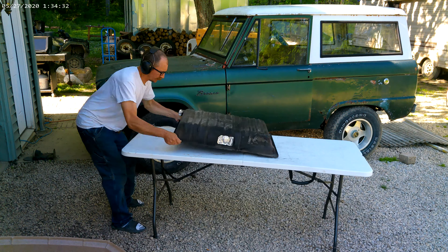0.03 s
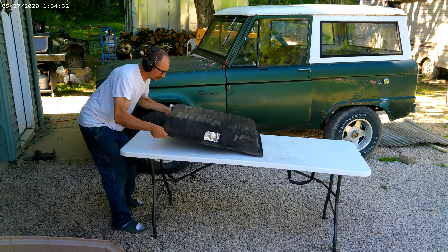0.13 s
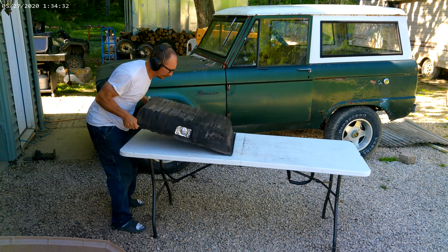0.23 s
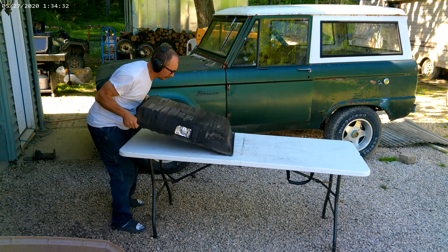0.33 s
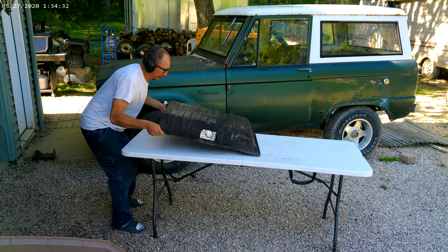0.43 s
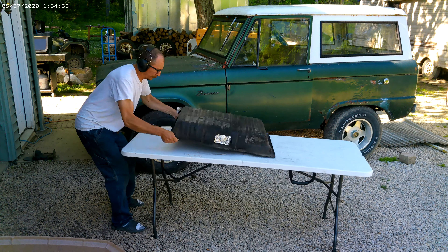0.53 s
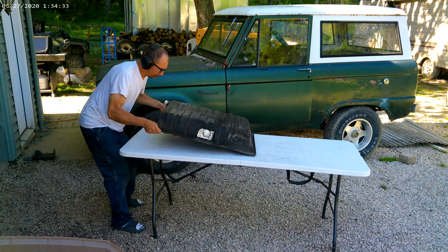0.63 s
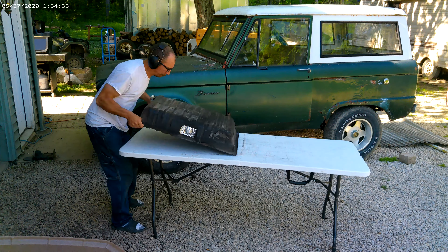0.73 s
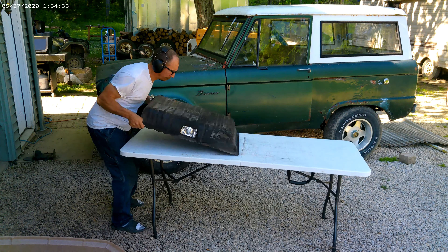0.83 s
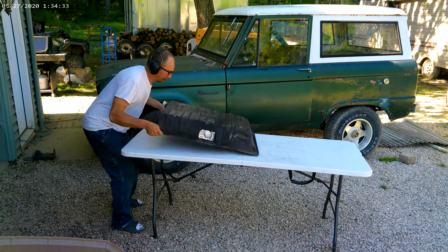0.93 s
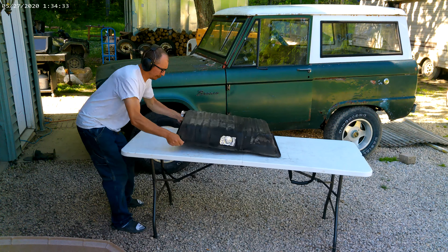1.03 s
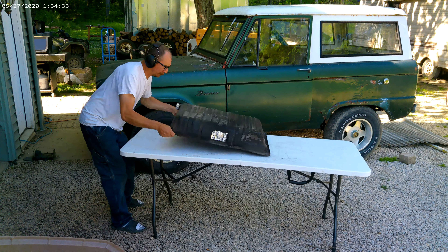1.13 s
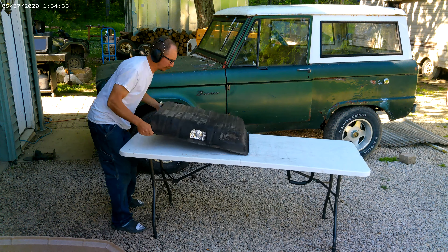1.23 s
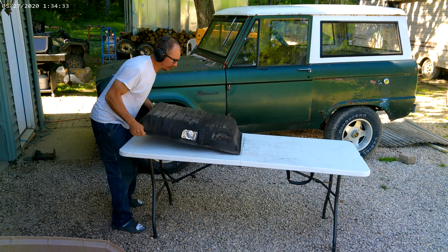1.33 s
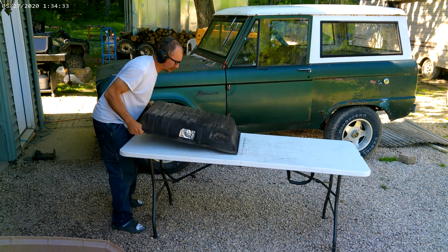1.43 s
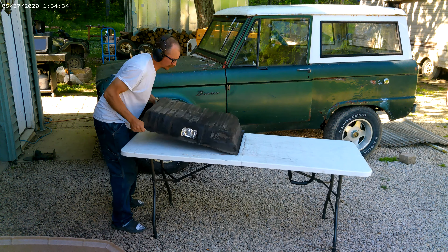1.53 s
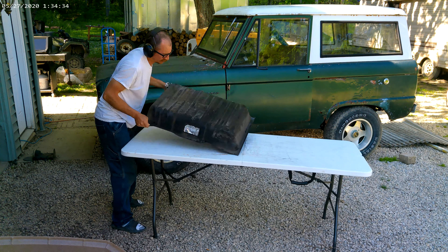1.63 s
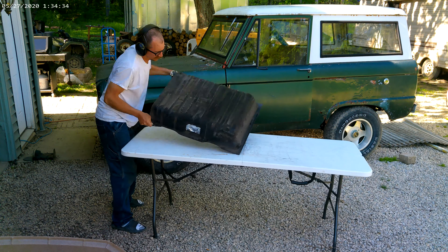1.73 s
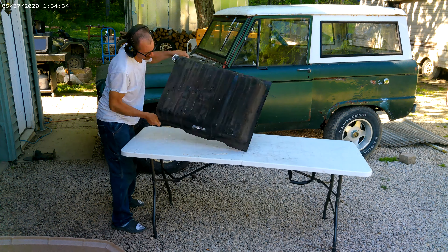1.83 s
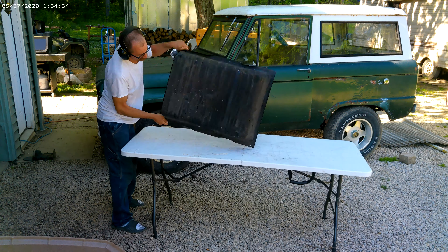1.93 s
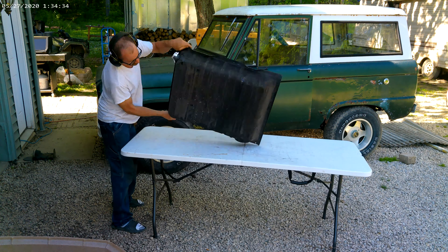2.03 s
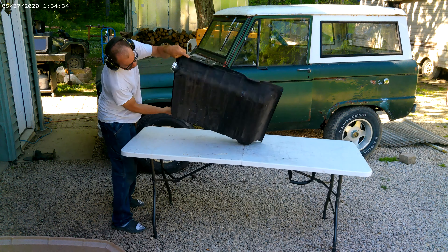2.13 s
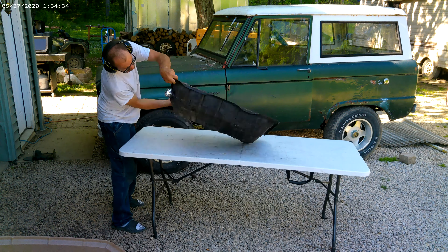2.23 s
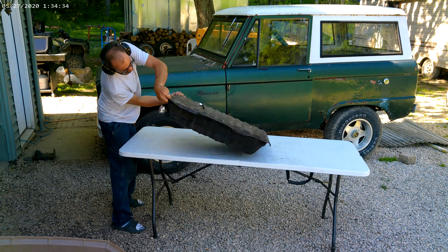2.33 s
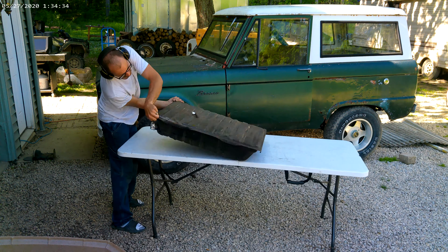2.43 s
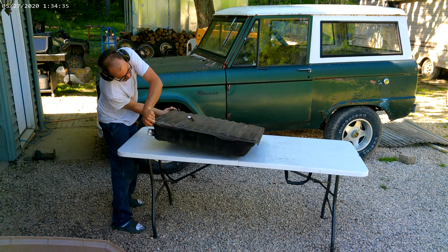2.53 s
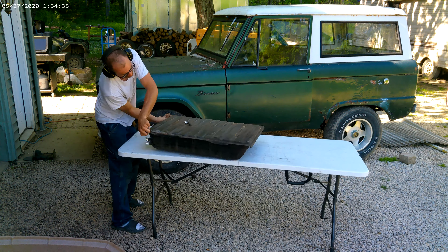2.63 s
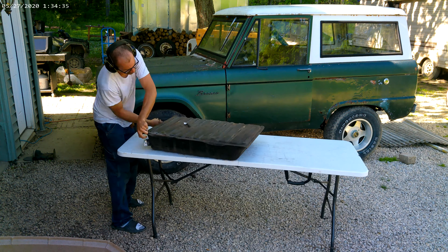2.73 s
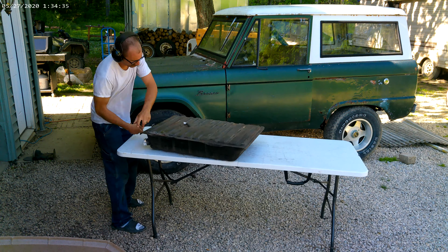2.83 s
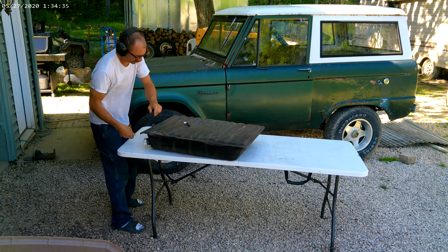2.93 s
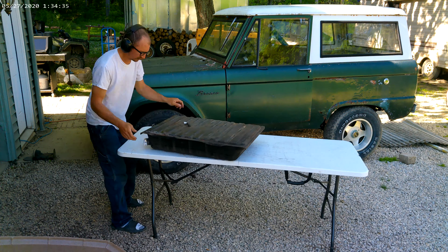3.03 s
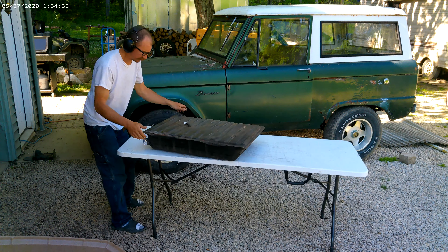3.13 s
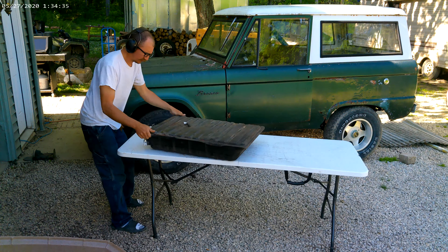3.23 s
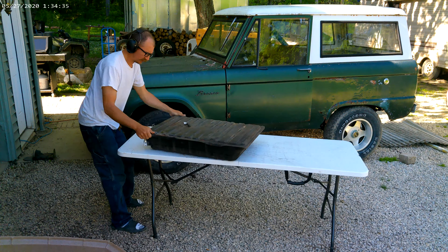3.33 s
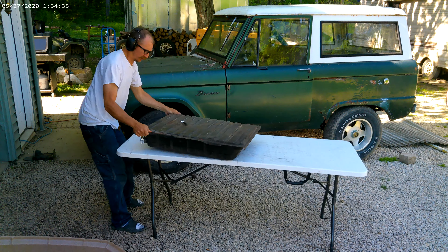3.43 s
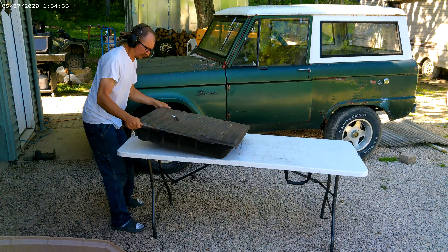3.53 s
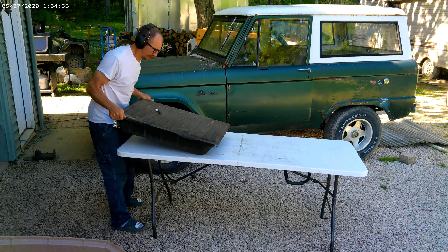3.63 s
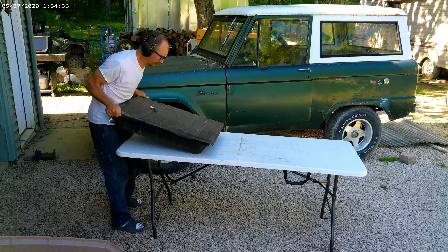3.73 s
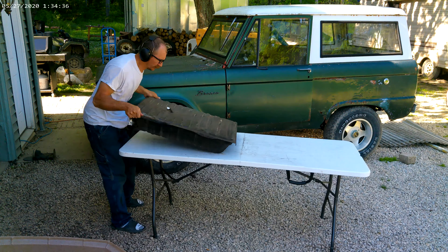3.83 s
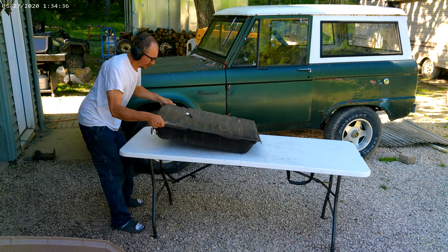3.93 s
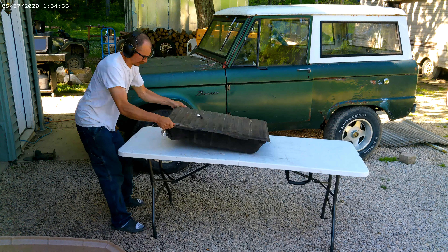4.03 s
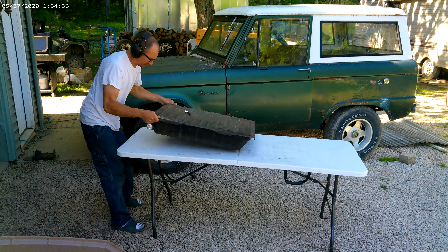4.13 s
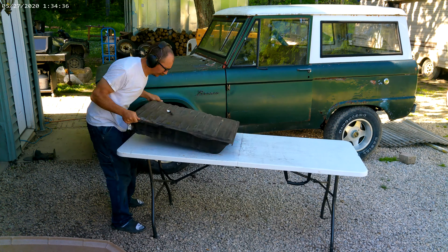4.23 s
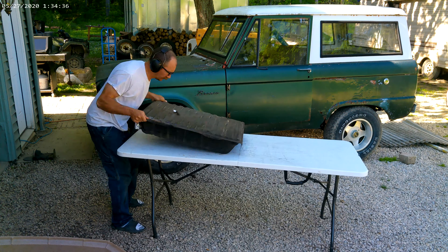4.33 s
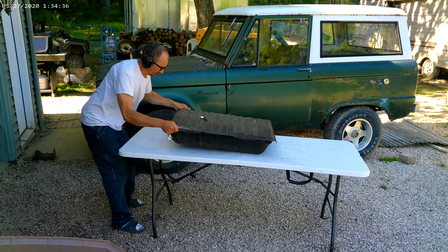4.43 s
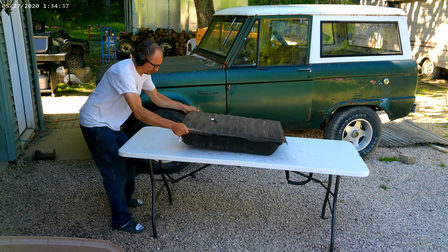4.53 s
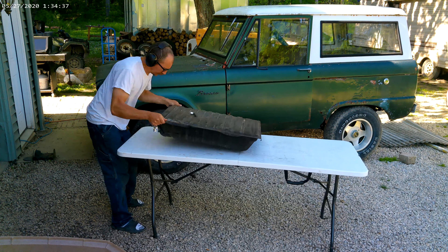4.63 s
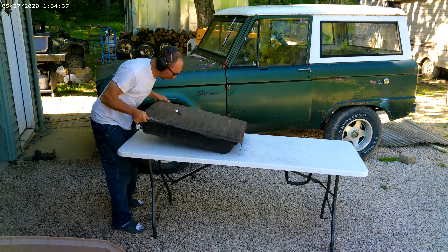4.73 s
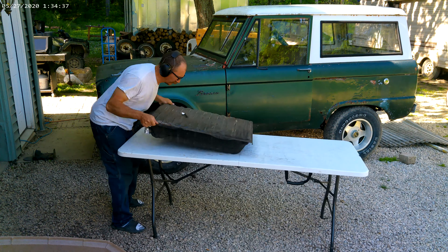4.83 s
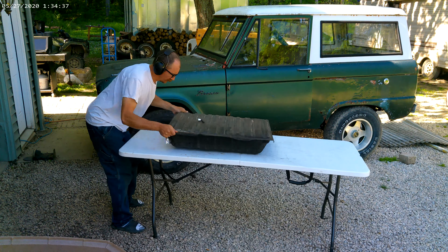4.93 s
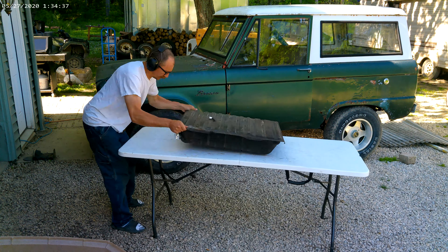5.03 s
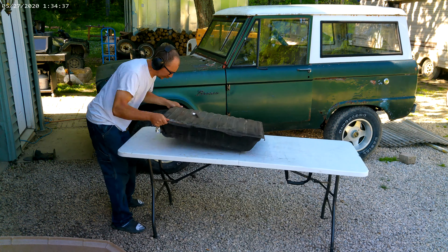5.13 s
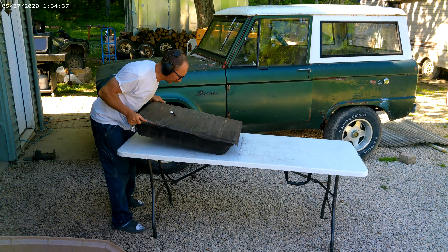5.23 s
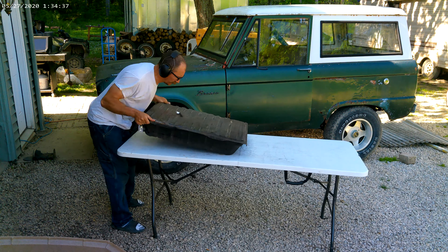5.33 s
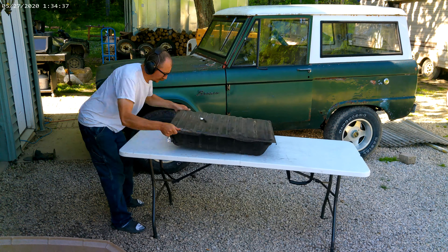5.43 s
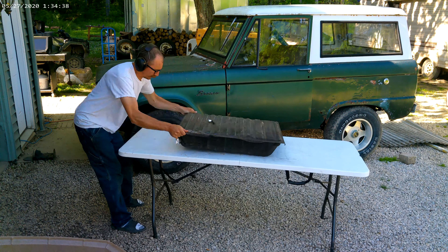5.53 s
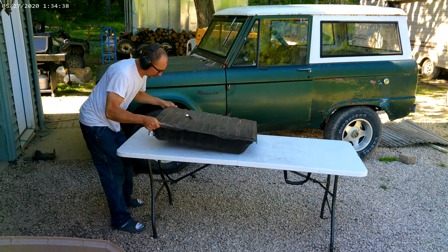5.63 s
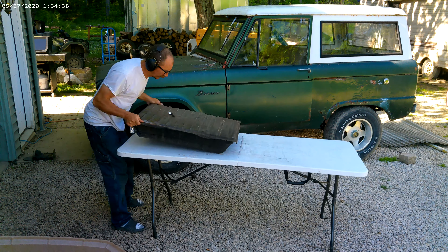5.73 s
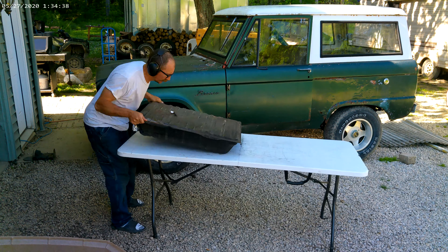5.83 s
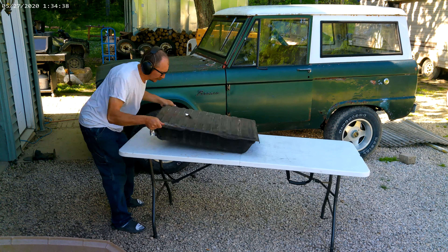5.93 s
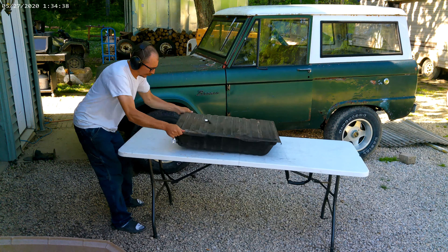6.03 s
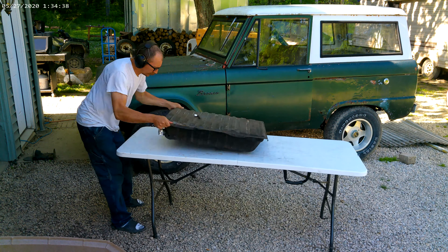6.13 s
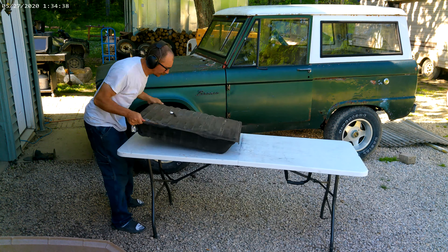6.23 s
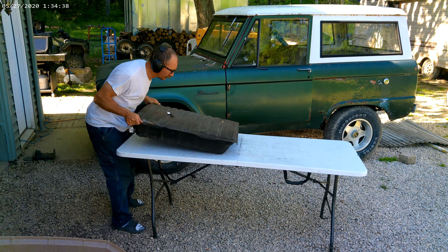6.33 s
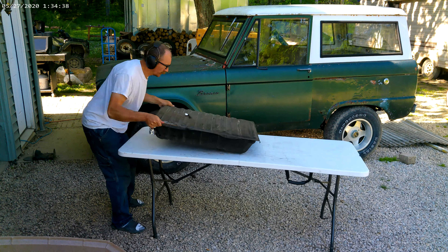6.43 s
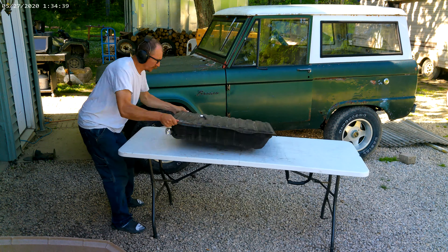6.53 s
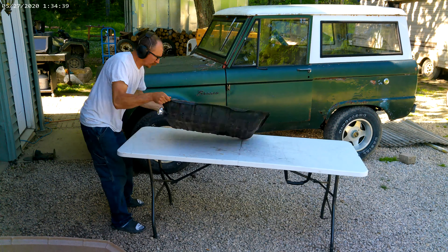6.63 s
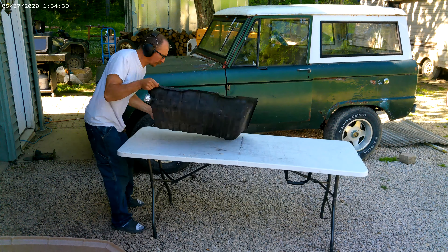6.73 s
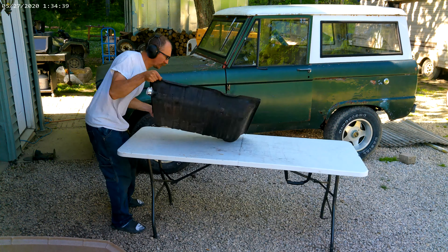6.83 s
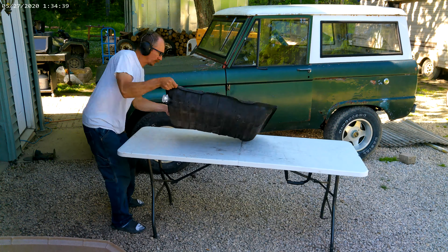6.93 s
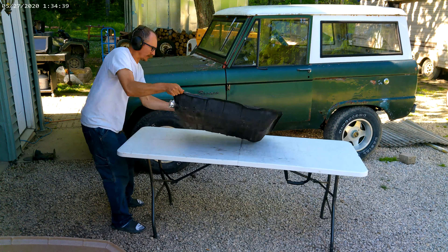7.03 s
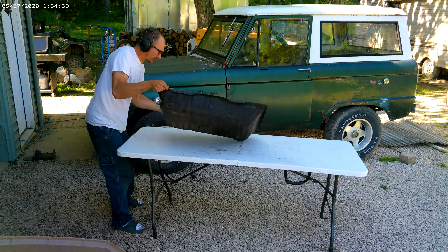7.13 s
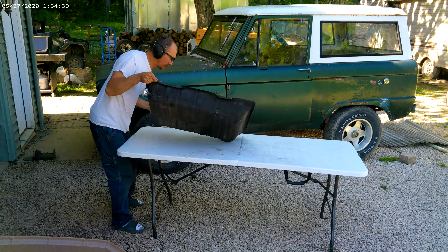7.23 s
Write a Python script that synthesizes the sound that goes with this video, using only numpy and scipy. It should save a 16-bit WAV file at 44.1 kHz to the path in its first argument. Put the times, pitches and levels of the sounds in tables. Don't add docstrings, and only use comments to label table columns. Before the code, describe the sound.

Loose gravel slams and rattles loudly inside a hollow steel tank rocked by hand, nearly hushes as it is turned over, then crashes harder again.

```python
import sys
import numpy as np
from scipy import signal
from scipy.fft import rfft, irfft, next_fast_len
from scipy.io import wavfile
from scipy.ndimage import uniform_filter1d

SR = 44100
rng = np.random.default_rng(int(sys.argv[2]) if len(sys.argv) > 2 else 0)


def invert_db(level):
    return 10 ** (np.asarray(level, dtype=float) / 20)


def unload_wav(signal):
    wavfile.write(
        sys.argv[1],
        SR,
        np.round(np.clip(np.atleast_2d(signal).T, -1, 1) * 32767).astype(np.int16),
    )


N = 321048
MODE_COUNT = 1400


def evened(x):
    return x / np.sqrt(np.mean(x ** 2) + 1e-20)


def read(points, hz):
    f, value = np.transpose(points)
    return np.interp(np.log(hz + 1), np.log(f + 1), value)


def resonate(x, hz, width):
    return signal.lfilter(*signal.iirpeak(hz, hz / width, SR), x)


def wander(smooth_s):
    size = max(round(smooth_s * SR), 1)
    once = uniform_filter1d(rng.standard_normal(N), size)
    return evened(uniform_filter1d(once, size))


def yard():
    # frequency in Hz, level in dB.
    air_tone = [(12, -31.5), (20, 6), (48, 7), (116, -6.5), (365, -22), (468, -31), (879, -28), (980, -39),
                (2700, -39), (14000, -40)]
    level_db = -51.5 + 1.1 * wander(0.087)
    colour = invert_db(read(air_tone, np.fft.rfftfreq(N, 1 / SR)))
    air = irfft(rfft(rng.standard_normal(N)) * colour, N)
    return invert_db(level_db) * evened(air)


def surge(t, peak_s, rise_s, fall_s):
    edge_db = -12.5
    return edge_db * np.maximum((peak_s - t) / max(rise_s, .005), (t - peak_s) / max(fall_s, .005))


def load():
    # time in seconds, rattle in dB,
    # stone-on-stone chatter in dB above it, wall boom in dB above it.
    rolling = [(0.0, -17.5, -5, -2), (0.5, -17.5, -1.5, -1.5), (1.0, -18, -6.5, -3), (1.455, -20, -13, -3),
               (1.465, -33, -22, -3), (1.68, -52.5, -19, 7), (1.83, -60, -5, 10), (1.96, -34, -6, 6),
               (2.2, -24, -15, 0), (2.74, -30, -22, -7.5), (2.9, -40.5, -16, -6), (3.12, -53, -20, 5),
               (3.47, -57, -16, 0), (3.54, -39, -15, -1.5), (3.815, -33.5, -12, 2.5), (3.83, -20, -18, -2),
               (4.6, -19.5, -9.5, -3), (7.28, -19.5, -10.5, -2.5)]
    # peak in seconds, rattle in dB, fall in seconds, chatter in dB.
    slams = [
        (0.01, -7, 0.01, -11.5),
        (0.148, -6.5, 0.032, -2),
        (0.64, -8, 0.1, -5),
        (1.12, -8.5, 0.089, -4.5),
        (2.31, -12.5, 0.067, -10),
        (4.087, -9.5, 0.081, -9.5),
        (4.601, -5, 0.12, -9.5),
        (5.072, -6, 0.14, -10),
        (5.601, -2.5, 0.065, -14),
        (6.114, -6, 0.12, -14),
    ]
    # peak in seconds, rattle in dB,
    # length in seconds, chatter in dB.
    slides = [(0.259, -11, .1, -20.5), (0.949, -16.5, 0.14, -5.5), (1.343, -21, 0.22, -1.5),
              (2.103, -20.5, 0.12, -12.5), (2.175, -20, 0.059, -7), (2.252, -15, 0.03, -21),
              (2.403, -16, 0.061, -5.5), (2.473, -17, 0.055, -8.5), (2.59, -16, 0.029, -29),
              (2.653, -15, 0.082, -10), (2.756, -26.5, 0.039, -6), (3.627, -32.5, 0.051, -18),
              (4.396, -12.5, 0.1, -11), (4.46, -10.5, 0.18, -13), (4.734, -16.5, 0.03, 1.5),
              (4.907, -8, 0.3, -14), (5.241, -15.5, 0.037, 1.5), (5.383, -10.5, 0.24, -14.5),
              (5.767, -12, 0.21, -14), (5.918, -11, 0.18, -14), (6.019, -12.5, 0.056, -11),
              (6.286, -15, 0.06, -35), (6.407, -14, 0.39, -15.5), (6.667, -14.5, 0.14, -6.5),
              (6.967, -14, 0.14, -7.5), (7.095, -12.5, 0.33, -8), (7.242, -15, 0.011, -9),
              (0.702, -10.5, 0.058, -21), (6.558, -23, 0.13, -67)]
    # time in seconds, dip in dB.
    pauses = [(0.33, -1.5), (0.52, -4), (1.27, -1.5), (2.2, -5.5), (2.435, -7.5), (2.555, -9), (4.77, 0),
              (5.45, -2), (5.84, -5), (5.985, -4.5), (6.33, -4.5), (6.86, -7), (7.03, -1.5), (7.221, -5)]
    slam_rise_s, slide_rise = 0.034, .5
    lull_s, lull_db, lull_width_s = .06, -4, .025
    surge_boom, boom_lead_s = -0.23, 0.011

    t = np.arange(0, N / SR + .02, .002)
    s, *columns = np.transpose(rolling)
    rolling_db, chatter_db, boom_db = (np.interp(t, s, db) for db in columns)
    rows = [(rolling_db, chatter_db)]
    for at, db, length, extra in slides:
        rows.append((db + surge(t, at, slide_rise * length, (1 - slide_rise) * length), extra))
    dip_db = sum(lull_db * np.exp(-((t - at + lull_s) / lull_width_s) ** 2) for at, *_ in slams)
    dip_db = dip_db + sum(db * np.exp(-((t - at) / 0.016) ** 2) for at, db in pauses)
    rows = [(db + dip_db, extra) for db, extra in rows]
    rows += [(db + surge(t, at, slam_rise_s, fall), extra) for at, db, fall, extra in slams]

    rattle_db = 10 * np.log10(sum(invert_db(db) ** 2 for db, _ in rows))
    chatter_db = 10 * np.log10(sum(invert_db(db + extra) ** 2 for db, extra in rows))
    boom_db = rattle_db + boom_db + surge_boom * (rattle_db - rolling_db)
    boom_db = np.interp(t + boom_lead_s, t, boom_db)
    heard = np.arange(N) / SR + 0.0065
    return [np.interp(heard, t, db) for db in (rattle_db, boom_db, chatter_db)]


def table(load_db):
    # resonance in Hz, width in Hz, level in dB.
    table_modes = [(57, 60, -2.5), (83.3, 21, 3.5), (171, 24, 2)]
    # time in seconds, level in dB.
    jolt_rows = [(0.03, -35), (0.32, -41), (0.5, -35), (0.66, -34), (1.0, -35), (1.23, -35), (1.34, -41),
                 (1.55, -50), (1.7, -57), (2.29, -44), (2.46, -32), (2.55, -39), (2.78, -38), (3.57, -48),
                 (3.97, -41), (4.12, -41), (4.59, -29.5), (5.05, -31), (5.13, -44), (5.6, -35), (5.88, -38),
                 (4.88, -37), (6.11, -33), (6.99, -41), (7.05, -37)]
    # start in seconds, peak in dB, pitch in Hz, t60 in seconds.
    bump_rows = [(0.169, 3.5, 513, 0.12), (0.585, 0, 810, 0.1), (1.329, -12, 586, 0.12),
                 (1.76, -39, 333, 0.24), (2.01, -4, 418, 0.095), (2.083, 11, 468, 0.038),
                 (2.31, -2, 600, 0.11), (2.385, -6, 604, 0.1), (2.6, -10, 793, 0.1), (2.98, -17, 702, 0.12),
                 (3.585, -22, 800, 0.08), (3.652, -17, 800, 0.13), (3.752, -13, 800, 0.06),
                 (3.77, -22, 450, 0.15), (4.815, 4, 597, 0.08), (2.466, -5, 289.4, 0.27),
                 (2.497, -20, 300, 0.2), (2.739, -12.5, 446, 0.22), (2.775, -13, 308, 0.11),
                 (3.497, -20, 428, 0.082), (4.574, 7, 453, 0.13), (4.4, -8, 773, 0.17),
                 (4.87, 7, 720, 0.068), (5.58, -5, 450, 0.087), (6.102, -1.5, 690, 0.32),
                 (7.185, -17, 440, 0.083)]
    jolt_rise_db_s, jolt_fall_db_s = 400, 205

    time, noise = np.arange(N) / SR, rng.standard_normal(N)
    shake = invert_db(-42.5 + 0.34 * (load_db + 9.5) + wander(.04))
    step = time[::100]
    jolts = sum(invert_db(db - np.maximum(jolt_rise_db_s * (s - step), jolt_fall_db_s * (step - s)))
                for s, db in jolt_rows)
    shake = shake + np.interp(time, step, jolts)
    shaken = sum(invert_db(db) * resonate(resonate(noise, hz, w), hz, 2 * w) for hz, w, db in table_modes)
    out = evened(shaken) * shake

    t = np.arange(9000) / SR
    for (s, peak_db, hz, t60), detune in zip(bump_rows, rng.standard_normal((len(bump_rows), 5))):
        cluster = np.sin(2 * np.pi * hz * np.outer(t, 1 + 0.12 * detune)).sum(1)
        cluster = cluster + 2.4 * np.sin(2 * np.pi * hz * t)
        bump = invert_db(peak_db - 13.5 - 60 * t / t60) * (1 - np.exp(-t / 0.017)) * cluster
        part = out[round(s * SR):][:len(t)]
        part += bump[:len(part)]
    return out


def grit(load_db):
    rasp_s = (3.38, 3.55, 4.05, 4.3)
    grains = rng.standard_normal(N) * invert_db(3 * wander(.002))
    hiss = evened(signal.sosfilt(signal.butter(2, 9000, "high", fs=SR, output="sos"), grains))
    moving = np.interp(np.arange(N) / SR, rasp_s, (0, 1, 1, 0))
    return hiss * moving * invert_db(-49 + 0.41 * (load_db + 20))


def ticks():
    # start in seconds, peak in dB, centre in Hz.
    tick_rows = [(0.538, -10, 3500), (0.885, -10, 8000), (2.235, -3, 3500), (2.245, -9, 4000),
                 (2.259, -9, 5000), (2.274, -9, 3000), (2.285, -1.5, 4500), (2.408, -15, 4500),
                 (3.134, -3, 3300), (3.2315, -22, 3800), (3.307, -40, 6500), (3.817, -21, 5000),
                 (3.844, -23, 7000), (3.868, -21, 5500), (1.6928, -40, 5000), (1.841, -42, 6000),
                 (3.5325, -33, 4500), (3.822, -16, 3480), (3.942, -28, 11000), (4.518, -11, 6500),
                 (5.231, -9, 7500), (5.506, -9, 6500), (6.818, -15, 6000), (7.241, -5, 2500),
                 (0.592, -14, 11000), (0.35, -22, 12000), (2.09, -12, 1500), (2.318, -4, 1500),
                 (2.388, -9, 1200), (3.404, -42, 3000)]
    t60_s, width = 0.0076, 0.7
    out, t = np.zeros(N + 600), np.arange(600) / SR
    for (s, peak_db, hz), noise in zip(tick_rows, rng.standard_normal((len(tick_rows), len(t)))):
        burst = invert_db(peak_db + 7 - 60 * t / t60_s) * (1 - np.exp(-t / 0.00032)) * noise
        out[round(s * SR):][:len(t)] += resonate(resonate(burst, hz, width * hz), hz, width * hz)
    return out[:N]


def knock():
    # mode in Hz, level in dB, t60 in seconds.
    floor_modes = [(424, -7, 0.23), (1421, -7, 0.11), (1809, -7, 0.15), (2557, 0, 0.13), (2842, -9, 0.22),
                   (3338, 2, 0.07), (3720, -10, 0.12), (4360, -10, 0.12), (5437, -10, 0.082),
                   (5900, -3, 0.052)]
    start_s, level_db, spread, damp = 3.1335, -25, .035, 0.73
    out, t = np.zeros(N), np.arange(8000) / SR
    near = 1 + spread * rng.standard_normal((len(floor_modes), 4))
    ring = 0
    for (hz, db, t60), detune in zip(floor_modes, near):
        cluster = np.sin(2 * np.pi * hz * np.outer(t, detune)).sum(1)
        ring = ring + invert_db(level_db + db - 60 * t / (damp * t60)) * cluster
    out[round(start_s * SR):][:len(t)] = ring * (1 - np.exp(-t / .0008))
    return out


def wall():
    # frequency in Hz, level in dB per Hz.
    steel_tone = [(59, -49), (100, -41), (118, -12.5), (243, -2), (306, 3), (430, 5), (565, 0), (698, 3),
                  (760, 2), (1560, -5), (2230, -4.5), (3200, -10), (4390, -12.5), (6990, -19),
                  (15600, -41.5)]
    # frequency in Hz, t60 in seconds.
    ring_times = [(100, 0.94), (400, 0.39), (1200, 0.26), (3500, 0.17), (8000, 0.13), (16000, 0.1)]
    place = (np.arange(MODE_COUNT) + .5 * rng.random(MODE_COUNT)) / MODE_COUNT
    hz = 100 + 15900 * place ** 1.6
    t, t60 = np.arange(6000, dtype=np.float32) / SR, read(ring_times, hz)
    rings = np.sin(2 * np.pi * np.float32(hz)[:, None] * t) * invert_db(-60 * t / np.float32(t60)[:, None])
    rings = rings * (1 + 0.39 * np.exp(-t / 0.018) + 0.92 * np.exp(-t / 0.0016))
    strength = invert_db(read(steel_tone, hz)) * np.sqrt(place ** .6 / t60)
    boom = 1 / (1 + (hz / 1250) ** 4)
    chatter = 1 / (1 + (5000 / hz) ** 4)
    return rings, strength * np.sqrt([boom, 1 - boom - chatter, chatter])


def panels(x):
    # centre in Hz, width in Hz, level in dB.
    face_up = [(540, 47, 9.5), (896, 17, 6.5), (1300, 150, -0.5), (2090, 650, -44)]
    face_down = [(420, 78, 5.5), (710, 34, 0), (2290, 190, -11), (2830, 230, -15), (4200, 380, -8.5)]
    cavity_modes = [(2500, 690, -9.5), (248.2, 16, -0.5)]
    turn_s, upright_s, upright_db = 2.3, 0.51, -9
    since_turn = np.arange(N) / SR - turn_s
    turned = np.clip(since_turn / 2.7 + .5, 0, 1)
    up, down, cavity = (sum(invert_db(db) * resonate(x, hz, w) for hz, w, db in rows)
                        for rows in (face_up, face_down, cavity_modes))
    cavity = cavity * invert_db(upright_db * np.exp(-(since_turn / upright_s) ** 2))
    return x + cavity + invert_db(-10) * (1 - turned) * up + invert_db(-8.0) * turned * down


def stones(rings, shares):
    # start in seconds, peak in dB, crack in Hz, chatter in dB.
    strong_stones = [(0.1024, -1, 2320, 0), (0.2239, -14, 2360, -16), (0.4761, -3, 2040, -4),
                     (0.534, -3, 2020, -4), (0.61, -6, 2620, 5), (0.816, -2, 1940, -21),
                     (0.885, -6, 2400, 3), (2.202, -8, 2500, -5), (1.4842, -16, 2700, -20),
                     (1.55, -17, 2500, -15), (1.6, -23, 2000, -15), (1.508, -13, 2730, -24),
                     (1.692, -36, 2160, -22), (1.766, -36, 2660, -14), (1.8398, -25, 2270, -24),
                     (1.881, -25, 2020, -21), (1.933, -27, 1940, -18), (1.9777, -8.5, 2140, -31),
                     (2.0586, -10.5, 2180, -2), (2.247, -12, 2280, -10), (2.155, -8, 2300, -2),
                     (2.2335, -3.5, 2290, -23), (2.2584, -5.5, 2370, 0), (2.286, -9, 2350, -16),
                     (2.307, -7, 2010, -19), (2.37, -21, 2200, -9), (2.4718, -17, 1560, -22),
                     (2.5721, -5, 2320, -24), (2.6392, -13, 2260, 2), (2.7598, -27, 1680, -15),
                     (2.7985, -15.5, 2680, -22),
                     (3.4975, -34, 1300, -19), (3.5247, -28, 2190, -23), (3.5382, -21, 2460, -21),
                    (3.5736, -18.5, 2120, -21), (3.6225, -17, 2470, -25), (3.6674, -18, 2170, -21),
                    (3.752, -27, 2010, -26), (3.822, -7.5, 2430, -17), (3.8634, -8, 2460, -22),
                    (3.9392, -4, 2210, -27), (4.0609, -20, 2330, -24), (4.3293, -9, 2390, -15),
                    (4.345, -1.5, 2470, -0.5), (4.5177, -6, 2170, 8), (4.5656, -2, 2230, -20),
                    (4.5847, 11, 2210, -19), (5.0085, 0.5, 2500, -22), (5.04, 3.5, 2400, -13),
                    (5.049, 5.5, 2300, -13), (5.3167, -7.5, 2110, -10), (5.7107, -3, 2900, -10),
                    (5.3496, -6.5, 2210, -24), (5.504, -23.5, 2310, 19.5), (5.863, -9, 2120, -22),
                    (6.0825, -9, 2170, -31), (6.0974, 4.5, 2380, -4.5), (6.3531, 0, 2440, -27),
                    (6.5229, -17, 2240, -20), (6.595, -6.5, 2130, -19), (6.895, -6, 2520, -24),
                    (6.9996, 3, 1970, -16), (7.045, -4.5, 1640, -10), (7.2404, 2, 2600, -29)]
    stray_stones = [(2.8977, -19, 2700, -15), (2.9209, -9.5, 1990, -21), (2.93, -16, 2770, -24),
                    (2.9783, -15, 3320, -19), (2.9908, -13.5, 2840, -31), (3.0194, -29, 2680, -24),
                    (3.062, -27, 3740, -6), (3.133, -3.5, 3380, -28), (3.2307, -14, 3620, -23),
                    (3.303, -19, 1200, -22), (3.4037, -43, 2710, -20)]
    rows = [(*row, -9, -10) for row in strong_stones]
    rows += [(*row, -17, -19) for row in stray_stones]

    out, t = np.zeros(N + 2 * rings.shape[1]), np.arange(rings.shape[1]) / SR
    chance = rng.standard_normal((len(rows), MODE_COUNT + 5))
    shape, waits = chance[:, 5:], (7 * chance[:, :5]) % 1
    rung = np.float32(shape[:, None] * shares).reshape(-1, MODE_COUNT) @ rings
    rung = rung.reshape(len(rows), len(shares), -1)
    for (s, peak_db, hz, chatter_db, boom_db, rebound_db), spot, wait, parts in zip(rows, shape, waits, rung):
        parts = parts / np.sqrt((parts[:, :400] ** 2).mean(1, keepdims=True))
        gains = invert_db(peak_db - 14.5 + np.array([boom_db, 0., chatter_db]))
        crack = np.sin(2 * np.pi * hz * t) * np.cos(2 * np.pi * 0.071 * hz * t)
        crack = invert_db(peak_db + 2.5 - 60 * t / 0.0076) * crack
        hit = (gains @ parts + crack) * (1 - np.exp(-t / 0.00056))
        blows = np.zeros(1400)
        rebounds = np.clip(wait * .022 * SR, 0, 1399).astype(int)
        blows[rebounds] = invert_db(rebound_db - 7.1 * wait) * np.sign(spot[:5])
        blows[0] = 1
        out[round(s * SR):][:len(t) + 1399] += signal.fftconvolve(hit, blows)
    return out[:N]


def hail(level_db, per_s, spread_db):
    rate = per_s * invert_db(.17 * (level_db + 15.0))
    size = invert_db(spread_db * np.minimum(rng.exponential(1, N), 3.3))
    return size * (rng.random(N) < rate / SR) / np.sqrt(rate)


def steadied(strikes):
    power = uniform_filter1d(strikes ** 2, round(.05 * SR))
    return strikes * (abs(power) / np.mean(strikes ** 2) + 0.048) ** -.5


def gravel(rings, shares, level_db, boom_db, chatter_db):
    spot_count, stretches = 14, 7
    spot_colour_db = 2.5
    on_steel = hail(level_db, 1200, 3.71) * invert_db(1.72 * wander(0.012))
    on_stone = hail(level_db, 1200, 4.4)
    length = N // stretches + 1
    at_spot = rng.integers(0, spot_count, length) == np.arange(spot_count)[:, None]
    shape, colour = rng.standard_normal((2, stretches, spot_count, MODE_COUNT))
    shape = shape * invert_db(spot_colour_db * evened(uniform_filter1d(colour, size=90, axis=2)))
    hard = invert_db(3 * np.clip(rng.standard_normal(N), -1.5, 2))
    layers = ((boom_db + 40., on_steel / hard),
              (level_db + 40.5, on_steel),
              (chatter_db + 39., on_steel * hard + 1.15 * on_stone))

    size = next_fast_len(length + rings.shape[1])
    out = np.zeros(N + 2 * size)
    for share, (layer_db, strikes) in zip(shares, layers):
        drive = np.float32(np.pad(steadied(strikes) * invert_db(layer_db), (0, length)))
        for k, spots in enumerate(shape):
            rung = np.float32(spots * share) @ rings
            rung = rung / np.linalg.norm(rung, axis=1, keepdims=True)
            both = rfft(drive[k * length:][:length] * at_spot, size) * rfft(rung, size)
            out[k * length:][:size] += irfft(both.sum(0), size)
    return out[:N]


def scene():
    levels_db = load()
    around = yard() + table(levels_db[0]) + grit(levels_db[0]) + ticks() + knock()
    rings, shares = wall()
    tank = panels(stones(rings, shares) + gravel(rings, shares, *levels_db))
    tank = signal.sosfilt(signal.butter(4, 130, "high", fs=SR, output="sos"), tank)
    echoes = np.zeros(2000)
    echoes[[0, 190, 430, 820, 1500]] = 0.76, 0.013, -0.052, 0.069, -0.043
    return (signal.oaconvolve(tank, echoes)[:N] + around)[None]


def top_cut(x):
    return signal.sosfilt(signal.butter(12, 15740, fs=SR, output="sos"), x)


def record(dry):
    capsule = signal.lfilter(*signal.butter(2, 14000, fs=SR), dry)
    capsule = signal.lfilter(*signal.butter(1, 22, "high", fs=SR), capsule)
    clipped = np.clip(capsule, -.69, .68) + .0075
    rounded = signal.lfilter(*signal.butter(2, 16500, fs=SR), clipped)
    rounded = signal.sosfilt(signal.ellip(8, .3, 60, 15650, fs=SR, output="sos"), rounded)
    return top_cut(rounded)


dry = scene()
out = record(dry)
unload_wav(out)
```